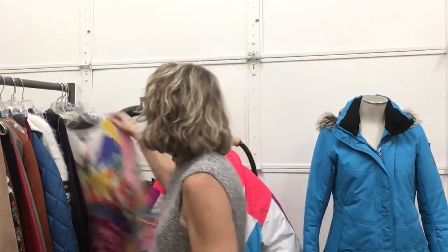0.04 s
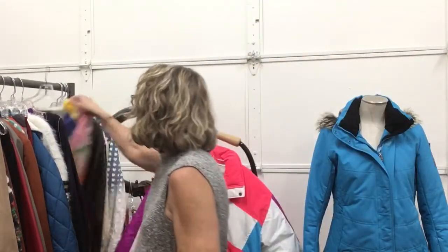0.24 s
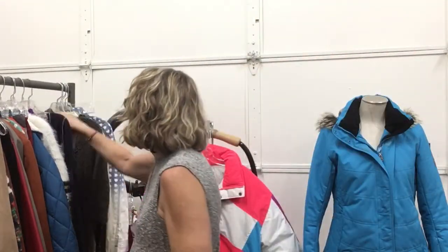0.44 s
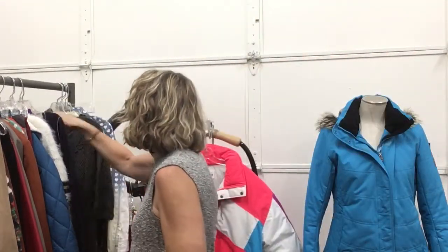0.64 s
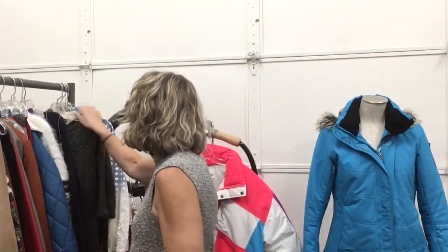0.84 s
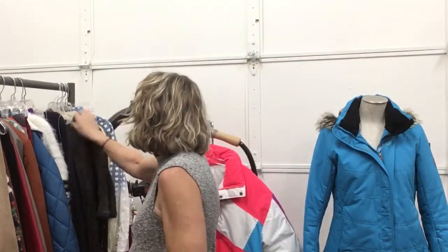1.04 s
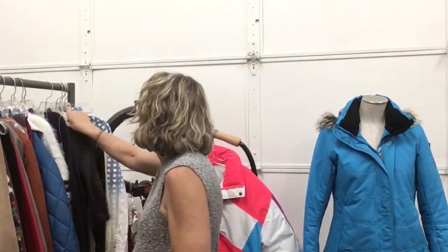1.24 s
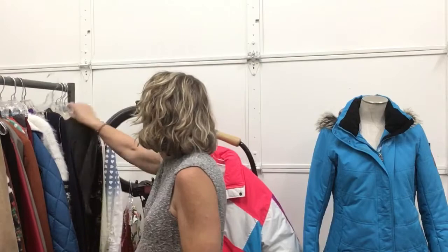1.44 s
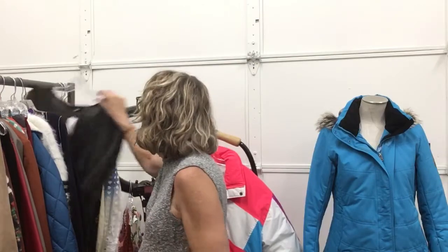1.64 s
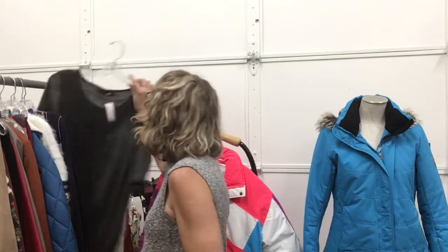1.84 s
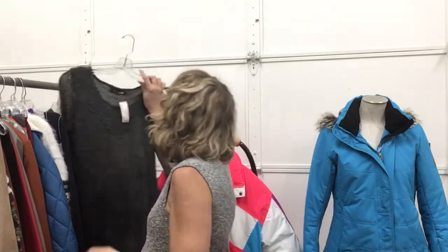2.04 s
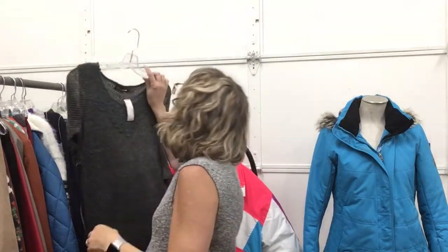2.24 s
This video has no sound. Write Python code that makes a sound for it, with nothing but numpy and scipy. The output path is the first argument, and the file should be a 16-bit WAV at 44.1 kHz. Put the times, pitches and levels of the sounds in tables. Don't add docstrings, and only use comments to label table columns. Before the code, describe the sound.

Plastic clothes hangers clack on a metal rail. After faint ticks, two loud, bright rattling clacks land at about 0.23 and 0.35 seconds, ringing into a bare, hard room. A faint knock follows at 0.55, then light touches. Around 1.15 to 1.25 a dragged wire hook squeaks very high. Small knocks come near 1.35, then quiet hiss, low hum and a faint distant machine, briefly revving near 1.8.

```python
import sys
import numpy as np
from scipy import signal
from scipy.fft import rfft, irfft, next_fast_len
from scipy.io import wavfile
from scipy.ndimage import uniform_filter1d

SR = 44100
rng = np.random.default_rng(int(sys.argv[2]) if len(sys.argv) > 2 else 0)


def to_wav(s):
    ch = np.atleast_2d(s).T
    pcm = np.round(np.clip(ch, -1, 1) * 32767)
    wavfile.write(sys.argv[1], SR, pcm.astype(np.int16))


def boost_factor(decibels):
    exponent = np.asarray(decibels, float) / 20
    return 10 ** exponent


N = 101429
T_S = np.arange(N) / SR
FFT_SIZE = next_fast_len(N)
FFT_HZ = np.arange(FFT_SIZE // 2 + 1) * SR / FFT_SIZE

# start_s, level_db, rise_s, fall_t60_s, ring_db
CLACKS = [
    (0.2336, -25, .004, 0.07, -11.5),
    (0.3544, -27, .004, 0.045, -11.5),
    (0.5521, -45, .003, 0.044, -5.5),
    (1.3457, -53.5, .003, .09, -8.5),
]
# freq_hz, density_db
CLACK_COLOURS = [
    [(120, -34.5), (900, -14), (2510, -1), (4270, -2), (4600, -12), (4950, 0), (9580, -8.5), (11300, -5),
     (16000, -13.5)],
    [(120, -56.5), (200, -19.5), (2020, -18), (2910, -6.5), (4350, 2), (4770, -4), (11300, -7),
     (15200, -11.5), (16000, -30)],
    [(470, -45), (800, -34), (1850, -9), (2210, -17), (3140, -0.5), (5510, -16), (12300, -30), (16000, -59)],
    [(290, -52), (500, -17), (1280, -14), (3650, -17), (5240, -10), (6060, -11), (13400, -10), (16000, -23)],
]
# freq_hz, level_db, t60_s
CLACK_MODES = [
    [(337.7, -25, 0.5), (620, -18, 0.44), (558, -21.5, 0.1207), (813, -16.5, .19), (1112, -10, 0.17),
     (1280, -2.5, 0.029), (1567, -3.5, .05), (1980, -2.5, 0.065), (1767, -11.5, 0.23), (2267, 1, .07),
     (2507, -7.5, 0.12), (3980, 0, 0.11), (4520, -1, 0.094), (5640, 4.5, .05), (8510, -4.5, 0.23)],
    [(1240, -15.5, 0.055), (1640, -14.5, 0.067), (1802, -13, 0.038), (2317, -8.5, 0.05), (3716, 3.5, 0.063),
     (4440, -2, 0.18), (5430, -6.5, 0.12), (7020, 4, 0.021), (9120, -3, 0.25), (11000, -3.5, .15),
     (12000, -4, 0.15), (13500, -10, .2), (15100, -13, 0.3)],
    [(1128, -11, 0.0526), (1850, -6.5, .05), (1868, -8, 0.064), (3200, 0.5, 0.049), (4214, -7, 0.067),
     (2762, -2.5, .06)],
    [(788, -10.5, 0.25), (1265, 0, 0.071), (1609, -1.5, 0.059), (2250, -8, 0.12), (4115, -7, 0.06),
     (5220, -0.5, 0.2), (5620, 5, 0.11), (8300, 2, 0.063), (13250, -4, 0.26), (14780, -11, 0.2)],
]
# start_s, level_db, centre_hz, width_octaves, fall_t60_s
TICKS = [(.0, -61.5, 3500, 0.69, .035), (.05, -68.5, 480, 0.72, .25), (.119, -59, 3880, 0.65, 0.1),
         (1.04, -74, 2393, 0.57, 0.65), (.585, -67.5, 3600, 0.42, 0.16), (.2468, -39, 3000, 0.53, .04),
         (.3515, -47, 7000, 0.7, .04), (.536, -68, 12500, .3, .08), (.698, -65, 1800, 0.92, .06),
         (.765, -66, 9600, .12, .05), (1.026, -66.5, 6500, 0.71, .035), (1.082, -71.5, 2600, 1.5, .5),
         (1.105, -78, 11500, .4, 0.71), (1.379, -61.5, 2000, 1.02, 0.073), (1.393, -74, 2500, 1.4, .08),
         (1.404, -67.5, 5530, 0.25, 0.2), (2.197, -66.5, 1100, 0.55, .06)]
# start_s, level_db, pitch_hz, hold_s, t60_s
PINGS = [(.119, -71.5, 1310, .005, 0.068), (0.119, -61, 3870, .005, .03),
         (.12, -79.5, 11500, 0.0046, 0.048), (0.119, -69.5, 5550, 0.0046, 0.029),
         (.12, -69, 2314, 0.0053, .05), (.12, -79, 8300, 0.0057, 0.0399), (.765, -74.5, 9480, 0.012, .25),
         (1.036, -79.5, 7250, 0.1, .3), (1.065, -85.5, 10600, 0.062, .2), (1.10, -82, 11000, 0.036, .1),
         (1.088, -76, 2780, 0.023, .12), (1.088, -77.5, 3890, .025, .1), (1.088, -90, 4830, .02, .1),
         (1.09, -82.5, 2270, .08, .1), (1.15, -74.5, 3400, 0.011, .05), (1.163, -75.5, 3730, .022, 0.034),
         (1.335, -75.5, 2270, 0.023, .04), (1.378, -73, 2600, 0.0032, .06),
         (1.379, -76.5, 1100, 0.0074, .08)]
# time_s, pitch_hz, level_db
SQUEAK = [(1.07, 9000, -68), (1.133, 8995, -39), (1.147, 8980, -25.5), (1.16, 8950, -38),
          (1.182, 8945, -46), (1.194, 8954, -29), (1.21, 8956, -30.5), (1.241, 8960, -41),
          (1.247, 8958, -57)]
# time_s, rate_hz, level_db
ROCKING = [(1.095, 990, -85), (1.14, 1080, -83), (1.19, 1240, -76), (1.2, 1240, -92)]
# rocking_multiple, level_db, wobble_rad
SIDE_NOTES = [(-2, -29, 1.7), (-1, -26, 1.7), (1, -19, 1.1), (2, -25, 1.2), (3, -37, 2.4)]
# freq_hz, width_hz, level_db
RUBBED_MODES = [(5420, 80, -38), (7250, 50, -38.5), (10300, 500, -39), (13400, 500, -33.5),
                (14200, 300, -31), (15200, 175, -36.5), (15560, 90, -28.5)]
# freq_hz, t60_s
ROOM_DECAY = [(300, 1), (700, 0.82), (1500, .7), (3000, 0.6), (5000, 0.64), (8000, 0.47), (12000, 0.47),
              (15000, 0.29)]
# freq_hz, density_db
FLOOR_COLOUR = [(25, -34), (50, -9.5), (120, -6.5), (370, -22), (520, -28), (3500, -32.5), (12000, -40),
                (15800, -48.5)]
# time_s, pitch_hz, level_db
DRONE = [(0.0, 162.5, -58), (0.1, 139.8, -77), (0.188, 158.9, -65.5), (0.528, 154.2, -65.5),
         (0.574, 139, -71), (0.752, 177, -66.5), (0.89, 154.3, -66.5), (1.016, 152, -70.5),
         (1.096, 184, -67), (1.3, 141.8, -73.5)]
# time_s, pitch_hz, level_db
REV = [(1.7, 122.9, -69), (1.781, 131.2, -59.5), (1.829, 139.4, -62.5), (1.87, 149, -57),
       (1.891, 149.4, -68)]

RUB_START_S, RUB_END_S, RUB_PUSH_DB, RUB_HISS_DB = 1.137, 1.16, -30, -20
RUB_T60_S, SIDE_T60_S = 0.32, 0.4
ECHO_DB, ECHO_HOLD_S, ECHO_T60_S = -53, 0.045, 0.42
ROOM_DB, ROOM_GAP_S, RING_WET_DB = -6, 0.0018, -11
FLOOR_DB, HUM_HZ, HUM_DB, RUMBLE_HZ, RUMBLE_DB = -66.5, 118.3, -74.5, 67, -76


def unit(x):
    return x / np.sqrt(np.mean(x ** 2))


def coloured(points):
    hz, db = np.array(points).T
    gain = boost_factor(np.interp(np.log(FFT_HZ + 1), np.log(hz), db))
    return unit(irfft(rfft(rng.standard_normal(FFT_SIZE)) * gain, FFT_SIZE)[:N])


def band(hz, width_hz):
    gain = 1 / (1 + (2 * (FFT_HZ - hz) / width_hz) ** 2)
    return unit(irfft(rfft(rng.standard_normal(FFT_SIZE)) * gain, FFT_SIZE)[:N])


def walk(rate_hz):
    k = int(SR / rate_hz)
    steps = np.repeat(rng.standard_normal(N // k + 1), k)
    return unit(uniform_filter1d(uniform_filter1d(steps, k), k)[:N])


def held(start_s, rise_s, hold_s, t60_s):
    age_s = np.maximum(T_S - start_s, 0)
    fall_db = -60 * np.maximum(age_s - rise_s - hold_s, 0) / t60_s
    return np.minimum(age_s / rise_s, 1) * boost_factor(fall_db)


def blow(start_s, rise_s, t60_s):
    return held(start_s, rise_s, 0, t60_s)


def tone(curve, fade_t60_s):
    time_s, hz, db = np.array(curve).T
    outside_s = np.maximum(np.maximum(time_s[0] - T_S, T_S - time_s[-1]), 0)
    size = 2 ** .5 * boost_factor(np.interp(T_S, time_s, db) - 60 * outside_s / fade_t60_s)
    phase = 2 * np.pi * np.cumsum(np.interp(T_S, time_s, hz)) / SR
    return size, phase


def ring(hz):
    rate_hz = 35 + 0.045 * hz
    shake_rad = 1.05 * (1 + hz / 9000) * walk(rate_hz)
    level = 2 ** .5 * boost_factor(3.0 * walk(rate_hz))
    return level * np.sin(2 * np.pi * (hz * T_S + rng.random()) + shake_rad)


def clacks():
    rattles = rings = 0
    for clack, colour, modes in zip(CLACKS, CLACK_COLOURS, CLACK_MODES):
        start_s, level_db, rise_s, fall_t60_s, ring_db = clack
        for hz, mode_db, t60_s in modes:
            level = boost_factor(level_db + ring_db + mode_db)
            rings = rings + level * ring(hz) * blow(start_s, rise_s, t60_s)
        contact = boost_factor(level_db + 0.72 * walk(700)) * coloured(colour)
        rattles = rattles + contact * blow(start_s, rise_s, fall_t60_s)
    return rattles, rings


def ticks():
    out = 0
    for start_s, level_db, hz, octaves, t60_s in TICKS:
        colour = [(hz * 2 ** (octaves * k), -6 * k * k) for k in range(-3, 4)]
        touch = boost_factor(level_db + 3.0 * walk(500)) * coloured(colour)
        out = out + touch * blow(start_s, t60_s / 30, t60_s)
    return out


def pings():
    out = 0
    for start_s, level_db, hz, hold_s, t60_s in PINGS:
        level = 2 ** .5 * boost_factor(level_db + 2.1 * walk(60))
        mode = np.sin(2 * np.pi * hz * T_S + 1.0 * walk(110))
        out = out + level * mode * held(start_s, .003, hold_s, t60_s)
    return out


def rubbing(squeak_size, squeak_phase, rock_phase):
    push = boost_factor(RUB_PUSH_DB) * (squeak_size / squeak_size.max() + .03) ** 0.2
    rub = boost_factor(RUB_HISS_DB) * coloured([(4000, -29), (6500, -6.5), (9000, 10.5), (16000, -18.0)])
    for hz, width_hz, db in RUBBED_MODES:
        rub = rub + boost_factor(db + 3.0 * walk(70)) * band(hz, width_hz)
    sides = 0
    for multiple, db, wobble_rad in SIDE_NOTES:
        phase = squeak_phase + multiple * rock_phase + wobble_rad * walk(170)
        sides = sides + boost_factor(db + 5.0 * walk(119.7)) * np.sin(phase)
    hold_s = RUB_END_S - RUB_START_S
    rub = rub * held(RUB_START_S, .006, hold_s, RUB_T60_S)
    sides = sides * held(RUB_START_S, .006, hold_s, SIDE_T60_S)
    return push * (rub + sides)


def squeak():
    size, phase = tone(SQUEAK, 0.036)
    rock_size, rock_phase = tone(ROCKING, .04)
    smooth_size = uniform_filter1d(size, size=SR // 200)
    note = smooth_size * boost_factor(0.73 * walk(250)) * np.sin(phase)
    rock = rock_size * boost_factor(2.5 * walk(60)) * np.sin(rock_phase + 1.5 * walk(120))
    echo = boost_factor(ECHO_DB + 2.3 * walk(55)) * np.sin(phase + 1.8 * walk(45))
    echo = echo * held(SQUEAK[-2][0], .012, ECHO_HOLD_S, ECHO_T60_S)
    return note + rubbing(size, phase, rock_phase) + echo + rock


def room(x):
    tail = 0
    for hz, t60_s in ROOM_DECAY:
        colour = [(hz / 1.5, -40), (hz / 1.4, -3), (hz, 0), (hz * 1.4, -3), (hz * 3.1, -40)]
        tail = tail + coloured(colour) * (hz / 3000) ** .5 * blow(ROOM_GAP_S, 0.0033, t60_s)
    return signal.fftconvolve(x, tail / np.sqrt(np.sum(tail ** 2)))[:N]


def background():
    out = boost_factor(FLOOR_DB + .5 * walk(3.7)) * coloured(FLOOR_COLOUR)
    hum = 2 ** .5 * np.sin(2 * np.pi * HUM_HZ * T_S + .5 * walk(17))
    out = out + boost_factor(HUM_DB + 2.0 * walk(17)) * hum
    out = out + boost_factor(RUMBLE_DB) * band(RUMBLE_HZ, 16)
    for curve in (DRONE, REV):
        size, phase = tone(curve, 0.28)
        out = out + size * boost_factor(2.5 * walk(25)) * np.sin(phase + 1.2 * walk(27))
    return out


def scene():
    rattles, rings = clacks()
    hits = rattles + ticks() + pings()
    wet = boost_factor(ROOM_DB) * room(hits + boost_factor(RING_WET_DB) * rings)
    return (hits + rings + wet + squeak() + background())[None]


def low_pass(x):
    return signal.sosfilt(signal.butter(12, 16550, fs=SR, output="sos"), x)


def record(dry):
    low_cut = signal.butter(2, 45, "high", fs=SR, output="sos")
    high_cut = signal.ellip(8, .5, 60, 15700, fs=SR, output="sos")
    mix = signal.sosfilt(high_cut, signal.sosfilt(low_cut, dry))
    return low_pass(mix)


dry = scene()
out = record(dry)
to_wav(out)
```